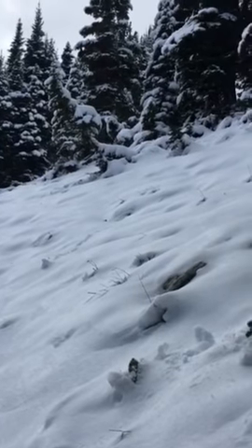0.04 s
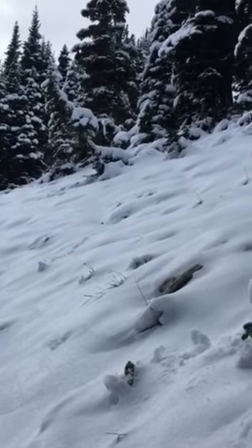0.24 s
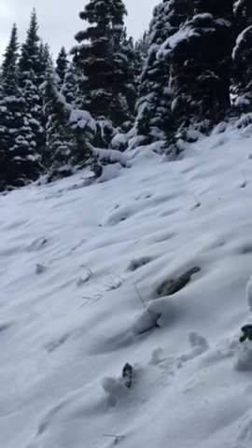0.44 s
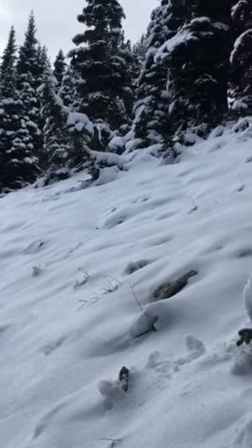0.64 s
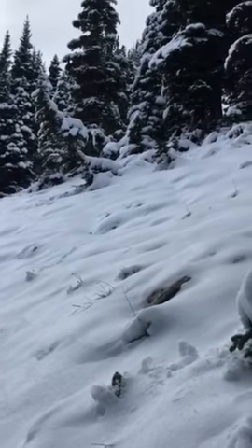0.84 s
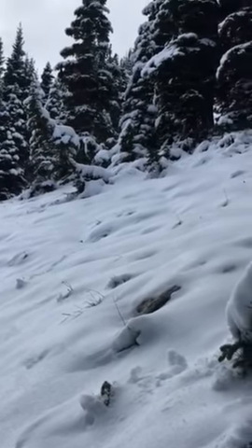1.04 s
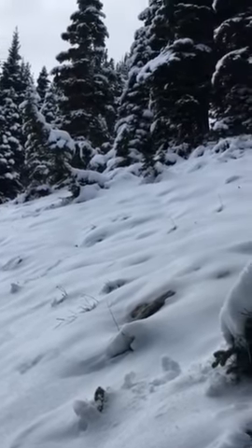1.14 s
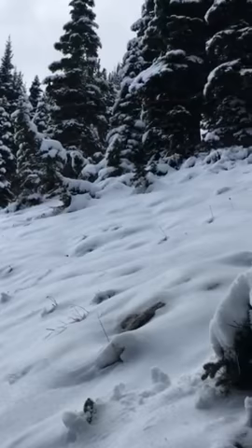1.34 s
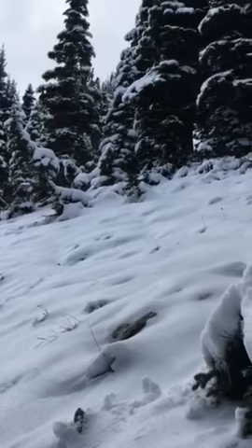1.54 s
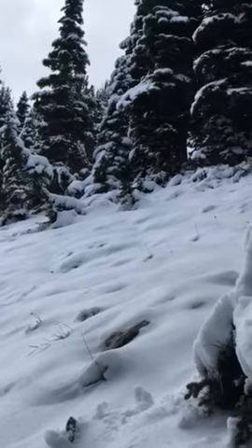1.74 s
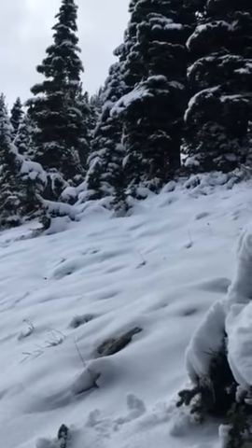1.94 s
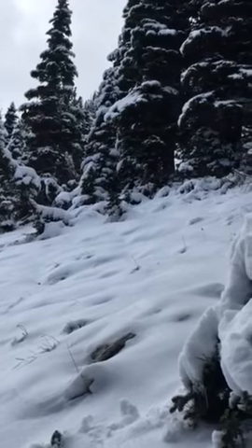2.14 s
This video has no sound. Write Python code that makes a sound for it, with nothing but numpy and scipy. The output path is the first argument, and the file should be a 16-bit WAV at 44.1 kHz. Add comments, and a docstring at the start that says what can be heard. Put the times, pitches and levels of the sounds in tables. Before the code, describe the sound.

Light wind puffs thud on the microphone, with faint clothing rustle and small handling knocks.

```python
"""Wind on a snowy hillside

Light puffs of wind thud on the microphone of a hand-held camera, over a soft rush of distant air.
Each puff is a short, deep, wavering tone with a rumble of noise. As the camera turns, clothing
rubs (grainy noise) and its creases snap (tiny bursts of noise). Near the end, the hand's grip
slips and makes a short run of faint knocks, each ringing the camera's housing for a moment."""
import sys
import numpy as np
from scipy import signal
from scipy.fft import rfft, irfft, next_fast_len
from scipy.io import wavfile
from scipy.ndimage import uniform_filter1d, map_coordinates

SR = 44100
rng = np.random.default_rng(int(sys.argv[2]) if len(sys.argv) > 2 else 0)


def put_to_file(sound):
    """Save the sound as 16-bit audio at rate SR, in the file named by the first command-line argument."""
    columns = np.atleast_2d(sound).T  # one column per channel
    safe = np.clip(columns, -1, 1)
    whole_steps = np.round(safe * 32767)
    wavfile.write(sys.argv[1], SR, whole_steps.astype(np.int16))


N = 97020  # 2.2 seconds


def amp(db):
    """Turn decibels into a number to multiply a sound by."""
    return 10 ** (np.asarray(db) / 20)


def unit(x):
    """Scale a sound to an average (rms) strength of 1."""
    return x / np.sqrt(np.mean(x ** 2) + 1e-20)


def along(points, hz):
    """Read between (frequency, value) points, giving each octave about equal room."""
    freqs, values = np.transpose(points)
    return np.interp(np.log(hz + 1), np.log(freqs + 1), values)


def wobble(rate):
    """A smooth curve through `rate` random values a second."""
    return map_coordinates(rng.standard_normal(4000), [np.arange(N) * rate / SR], mode="mirror")


def swell(time, db, half_length):
    """A bell-shaped rise and fall in loudness, highest at `time`."""
    return amp(db) * np.exp(-.5 * ((np.arange(N) / SR - time) / half_length) ** 2)


def filtered(x, response):
    """Turn each frequency of a sound up or down by response(hz)."""
    size = next_fast_len(N + SR // 2)
    hz = np.fft.rfftfreq(size, 1 / SR)
    return irfft(rfft(x, size) * response(hz), size)[:N]


def band(centre_hz, octaves):
    """Noise of strength 1 around one pitch, `octaves` wide."""
    response = lambda hz: 1 / np.sqrt(1 + (2 * np.log2((hz + 1) / centre_hz) / octaves) ** 6)
    return unit(filtered(rng.standard_normal(N), response))


def rush(spectrum, patchy_db):
    """Noise of strength 1 with the given tone colour and random louder and softer patches."""
    grid = signal.stft(rng.standard_normal(N), nperseg=512)[2]  # frequency by time
    patches = uniform_filter1d(rng.standard_normal(grid.shape), size=5, axis=0)
    patches = uniform_filter1d(patches, size=10, axis=1)
    noise = signal.istft(grid * amp(patchy_db * unit(patches)), nperseg=512)[1][:N]
    return unit(filtered(noise, lambda hz: amp(along(spectrum, hz))))


def add(track, time, sound):
    """Mix a sound into the track, starting at `time` seconds."""
    part = track[round(time * SR):][:len(sound)]
    part += sound[:len(part)]


def distant_air():
    """A soft, steady rush from the slope and the trees."""
    # tone colour of the air: (frequency [Hz], relative level [dB])
    spectrum = [(120, -24.5), (200, -6.5), (245, -2), (312, -1), (400, -2.5), (490, -5.5), (620, -3.5),
                (1260, -8.5), (1960, -18), (2110, -17), (3120, -23), (3360, -24), (11900, -30),
                (16900, -31.5)]
    return amp(-66) * rush(spectrum, patchy_db=1.12)


def clothing():
    """Rubbing cloth makes a grainy hiss and a duller rustle, with a few soft scuffs on top."""
    # strength of the rubbing: (time [s], level [dB])
    rubbing = [(0, -96), (.55, -82), (.73, -77), (.88, -77), (1.12, -72.5), (1.28, -70), (1.35, -70),
               (1.7, -68), (2.02, -71), (2.079, -73.5), (2.2, -76)]
    # tone colours of the hiss and the rustle: (frequency [Hz], relative level [dB])
    hiss_spectrum = [(300, -21), (1200, -1), (2200, 2), (3300, -3.5), (4800, -7), (6000, -4.5), (7500, -12),
                     (9400, -6.5), (10400, -15), (11500, -10.5), (16500, -14.5)]
    rustle_spectrum = [(100, 7), (220, -7), (360, 0), (700, -6), (1000, -2.5), (1450, -5), (2000, -11.5),
                       (3500, -28)]
    # scuffs of cloth: (time [s], level [dB], half-length [s], pitch [Hz], width [octaves])
    scuffs = [(0.31, -76, 0.012, 2860, 1.5), (0.456, -67.5, 0.012, 1300, 0.37),
              (0.582, -66.5, 0.046, 1320, 0.48), (0.724, -65.5, 0.011, 1436, 0.3),
              (0.733, -80, 0.072, 8100, 0.84), (1.037, -63, 0.044, 936, 0.81), (1.238, -64, 0.011, 1200, 2),
              (1.294, -61.5, 0.071, 970, 1.5), (1.298, -74, 0.012, 11500, 0.64),
              (1.297, -65, 0.014, 1920, 2), (1.342, -66.5, 0.018, 1230, 0.41),
              (1.44, -60.5, 0.018, 506, 2.75), (2.023, -71.5, 0.007, 4300, 1.5)]
    rub_db = np.interp(np.arange(N) / SR, *np.transpose(rubbing))
    hiss_db = rub_db + 0.48 * wobble(7.5) + 1.27 * wobble(350)  # slow drift plus fast grain
    hiss = amp(hiss_db) * rush(hiss_spectrum, patchy_db=0.6)
    rustle_db = rub_db + 6.5 + 0.39 * wobble(13.6) + 2 * wobble(180)
    rustle = amp(rustle_db) * rush(rustle_spectrum, patchy_db=2.5)
    scuffing = sum(swell(time, db, half_length) * band(hz, octaves)
                   for time, db, half_length, hz, octaves in scuffs)
    return hiss + rustle + scuffing


def crease_ticks():
    """Creases snap: very short bursts of noise around one pitch."""
    # small dry ticks: (time [s], peak level [dB], pitch [Hz], width [octaves])
    ticks = [(.6255, -61, 11800, .6), (1.3522, -42.5, 950, 1.9), (1.481, -53, 4600, 1.0),
             (1.856, -51.5, 1750, 1.1)]
    out, t = np.zeros(N), np.arange(N) / SR
    for time, db, hz, octaves in ticks:
        burst = band(hz, octaves) * amp(-60 * t / .016)  # fades 60 dB in 16 ms
        add(out, time, amp(db) * burst / np.abs(burst).max())
    return out


def grip_knocks():
    """The grip slips and knocks the housing. Its low tones ring last; it is too small to carry bass."""
    # knocks of the grip: (time [s], base level [dB], brightness [dB per octave])
    knocks = [(1.7363, -53, -7), (1.7709, -43, -3), (1.8229, -41.5, -3.5), (1.8739, -43.5, -1.5),
              (1.9728, -39.5, -1.5), (2.0168, -48.5, -1)]
    # the housing's tones: (pitch [Hz], relative level [dB], time to fade 60 dB [s], delay [s])
    tones = [(410, 2.5, .016, .0012), (660, -1.5, .011, .0006), (1050, -1, .01, .0002), (1500, -7, .007, 0),
             (2500, -15, .006, 0)]
    lowest_hz = tones[0][0]
    out, t = np.zeros(N), np.arange(SR // 10) / SR
    for time, knock_db, brightness in knocks:
        for hz, tone_db, fade_time, delay in tones:
            age = np.maximum(t - delay, 0)
            start_db = knock_db + tone_db + brightness * np.log2(hz / lowest_hz) + rng.normal(0, 1)
            pitch = hz * (1 + rng.normal(0, 0.055))
            add(out, time, amp(start_db - 60 * age / fade_time) * np.sin(2 * np.pi * pitch * age))
    bass_cut = signal.butter(2, 326, "highpass", fs=SR, output="sos")
    return signal.sosfilt(bass_cut, out)


def wind_puffs():
    """Each puff briefly shakes the microphone's opening and stirs the air; a draught flutters between."""
    # puffs of wind: (time [s], level [dB], half-length [s], pitch [Hz])
    puffs = [(0.097, -56, 0.0094, 54.3), (0.145, -38.5, 0.011, 60.5), (0.182, -41, 0.0054, 129.7),
             (0.196, -30, 0.0092, 62.3), (0.222, -39, 0.0092, 55.5), (0.267, -51.5, 0.012, 50),
             (0.39, -59, 0.034, 66.67), (0.53, -50.5, 0.0094, 58.43), (0.605, -43.5, 0.032, 70.04),
             (0.644, -36.5, 0.01, 61.6), (0.676, -36.5, 0.011, 56.4), (0.729, -49.5, 0.032, 66),
             (0.815, -49, 0.0081, 58), (0.959, -46, 0.0087, 52), (1.026, -50.5, 0.0062, 90.8),
             (1.047, -44.5, 0.025, 58), (1.205, -44.5, 0.021, 53), (1.35, -50.5, 0.017, 53.84),
             (1.443, -40, 0.0063, 80.2), (1.503, -46, 0.005, 61.9), (1.541, -48, 0.008, 60.2),
             (1.59, -47, 0.008, 57.4), (1.643, -48.5, 0.037, 69.8), (1.694, -38, 0.01, 57),
             (1.755, -56, 0.018, 59.5), (1.905, -42.5, 0.0092, 55), (2.046, -55.5, 0.0056, 60.7),
             (2.149, -51, 0.0043, 48.3)]
    # the weak draught: (time [s], level [dB])
    draught = [(0, -58.5), (.33, -60), (.48, -64), (.56, -53), (.88, -59.5), (1.0, -58.5), (1.12, -69),
               (1.28, -58.5), (1.85, -61.5), (2, -65.5), (2.2, -56)]
    # how the opening rumbles in wind: (frequency [Hz], relative level [dB])
    rumble_spectrum = [(15, -36), (28, -14), (42, -3), (62, 0), (78, -4), (100, -11), (135, -22),
                       (200, -33), (400, -80), (800, -160)]
    sag_octaves = .07  # the pitch falls this much per half-length as the puff spends itself
    pitch_wander, swirl_db = 0.0967, -15  # share of the pitch; swirling air relative to the puffs
    thuds, power, t = np.zeros(N), np.zeros(N), np.arange(N) / SR
    for time, db, half_length, hz in puffs:
        force = swell(time, db, half_length)
        pitch = hz * 2 ** (-sag_octaves * np.clip((t - time) / half_length, -2, 2))
        cycles = rng.random() + np.cumsum(pitch * (1 + pitch_wander * wobble(60))) / SR
        thuds += force * np.sqrt(2) * np.sin(2 * np.pi * cycles)
        power += force ** 2
    draught_db = np.interp(t, *np.transpose(draught))
    rumble_strength = amp(swirl_db) * np.sqrt(power) + amp(draught_db)
    return thuds + rumble_strength * rush(rumble_spectrum, patchy_db=1.5)


def scene():
    """All the sounds meet at one microphone."""
    return (distant_air() + clothing() + crease_ticks() + grip_knocks() + wind_puffs())[None]


def record(dry):
    """The camera cuts the deepest bass and fades out the highest treble."""
    bass_hz, treble_hz, top_hz = 32, 15800, 17100

    def response(hz):
        bass_loss = 1 + (bass_hz / (hz + 1)) ** 8
        treble_loss = 1 + (hz / treble_hz) ** 20
        return (hz < top_hz) / np.sqrt(bass_loss * treble_loss)

    return filtered(dry[0], response)[None]


dry = scene()
out = record(dry)
put_to_file(out)
```